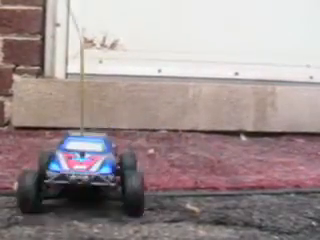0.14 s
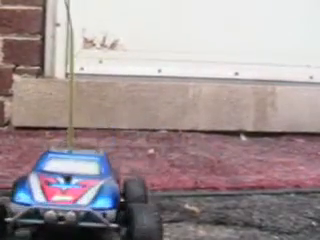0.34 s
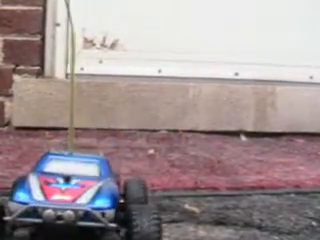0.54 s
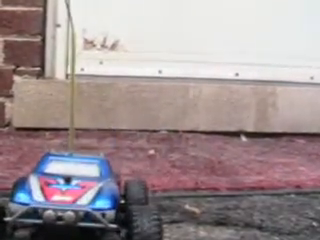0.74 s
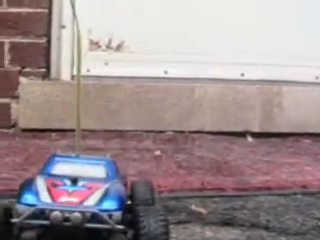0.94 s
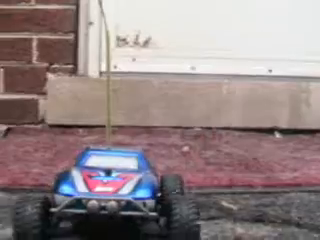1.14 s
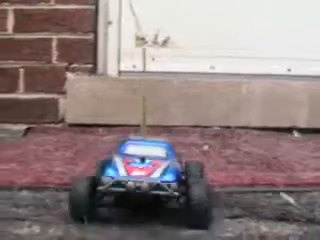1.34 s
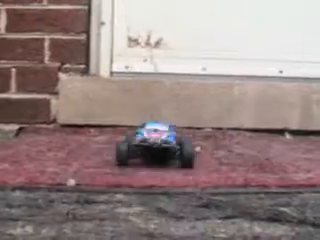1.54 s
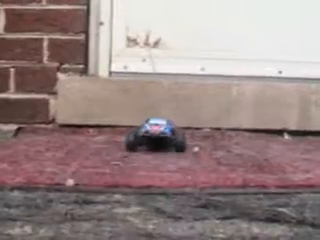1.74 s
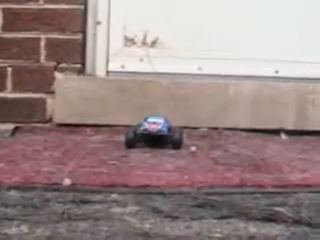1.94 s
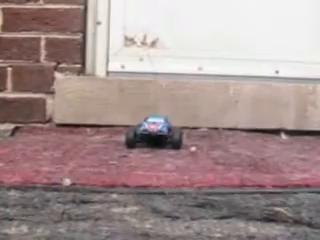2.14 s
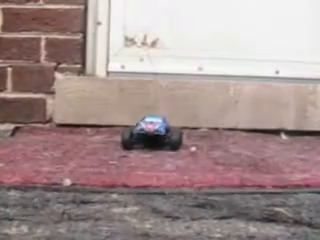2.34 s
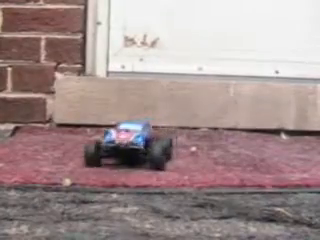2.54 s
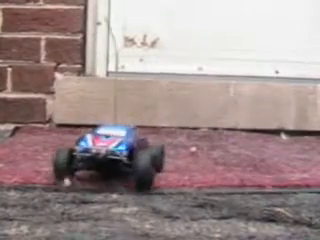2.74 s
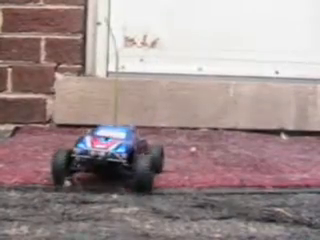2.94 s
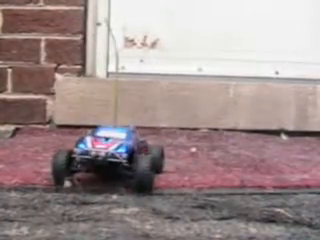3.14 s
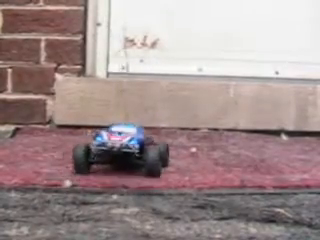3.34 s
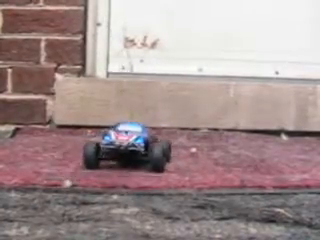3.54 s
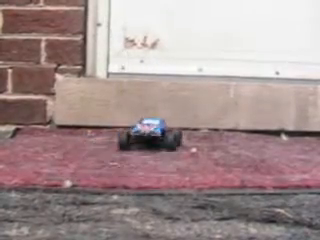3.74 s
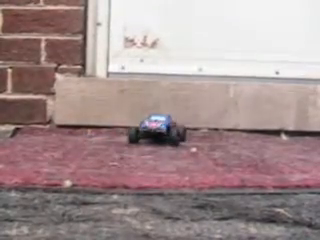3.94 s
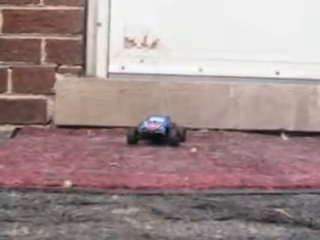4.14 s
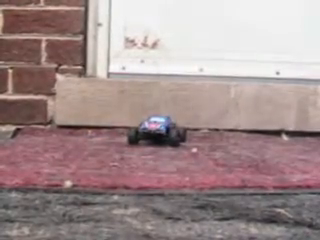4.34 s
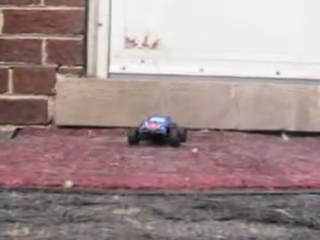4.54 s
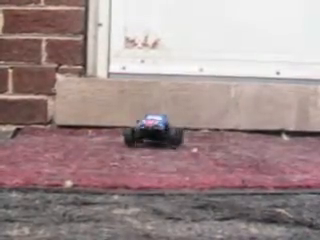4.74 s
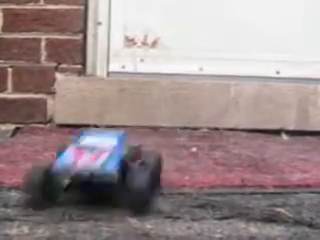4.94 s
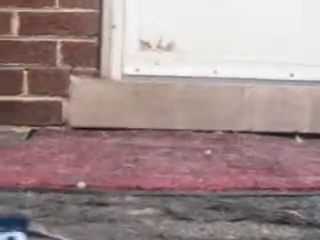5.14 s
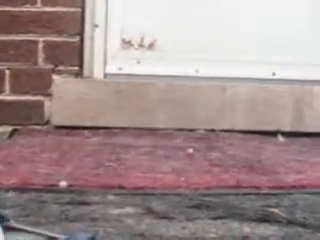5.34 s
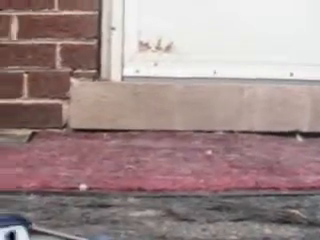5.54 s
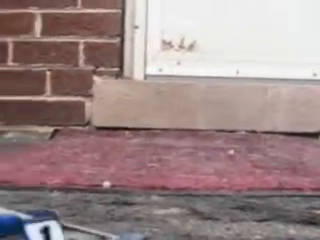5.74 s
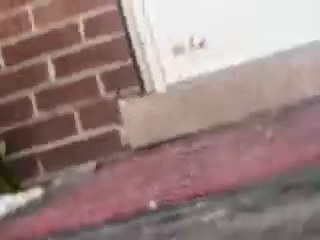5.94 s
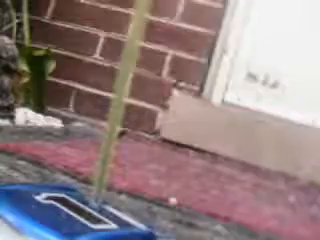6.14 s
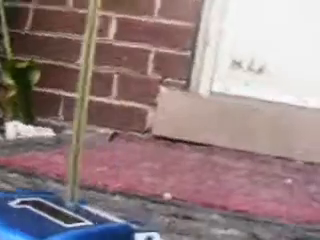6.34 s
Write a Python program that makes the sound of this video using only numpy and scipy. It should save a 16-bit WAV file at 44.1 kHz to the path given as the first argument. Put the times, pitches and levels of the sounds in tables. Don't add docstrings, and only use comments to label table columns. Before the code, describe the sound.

A small electric model truck squeaks, whirrs and zips in short gear-whine bursts with plastic clacks, then the microphone is bumped and handled.

```python
import sys
import numpy as np
from scipy import signal
from scipy.fft import rfft, irfft, next_fast_len
from scipy.io import wavfile
from scipy.ndimage import uniform_filter1d

SR = 44100
rng = np.random.default_rng(int(sys.argv[2]) if len(sys.argv) > 2 else 0)


def wav_out(sig):
    wavfile.write(sys.argv[1], SR, np.round(np.clip(np.atleast_2d(sig).T, -1, 1) * 32767).astype(np.int16))


def amplitude_ratio(level_db):
    exponent = np.asarray(level_db, float) / 20
    return 10 ** exponent


N = 281351
TIME = np.arange(N) / SR

# (frequency [Hz], level [dB], t60 [s])
GEARBOX_MODES = [(2080, 4, .012), (3020, 6, .012), (3800, 5, .012), (4250, 1, .012)]


def rms_one(x):
    return x / np.sqrt(np.mean(x ** 2) + 1e-20)


def levels(tables, column):
    out = np.zeros(N)
    for rows in map(np.array, tables):
        out += amplitude_ratio(np.interp(TIME, rows[:, 0], rows[:, column], left=-200, right=-200))
    return uniform_filter1d(out, size=66)


def gate(on, off):
    return np.clip(np.minimum(TIME - on, off - TIME) * 500, 0, 1)


def drift(hz):
    pole = np.exp(-2 * np.pi * hz / SR)
    noise = rng.standard_normal(N + SR)
    return rms_one(signal.lfilter([1], [1, -2 * pole, pole * pole], noise)[SR:])


def colour(x, spectrum):
    hz, db = np.transpose(spectrum)
    bins_hz = np.arange(N // 2 + 1) * SR / N + 1
    response = amplitude_ratio(np.interp(np.log(bins_hz), np.log(hz), db))
    return rms_one(irfft(rfft(x) * response, N))


def grains(per_s, spread_db):
    sizes = amplitude_ratio(spread_db * np.minimum(rng.exponential(1, N), 5)) * rng.choice([-1, 1], N)
    return sizes * (rng.random(N) < per_s / SR)


def ring(x, hz, t60):
    radius = amplitude_ratio(-60 / (t60 * SR))
    angle = 2 * np.pi * min(hz, 9000) / SR
    return signal.lfilter([0, np.sin(angle)], [1, -2 * radius * np.cos(angle), radius * radius], x)


def blows(events, modes, t60, crack_db, contact_s):
    size = 6000
    out = np.zeros(N + size)
    t = np.arange(size) / SR
    for s, peak_db, bright_db, part_hz in events:
        rough = rng.standard_normal((2, size))
        rough[:, 0] = 6.0, 4.0
        contact = rough[0] * np.exp(-t / contact_s)
        body = 0
        for hz, db, ring_s in modes:
            octaves_off = abs(np.log2(hz / part_hz))
            body = body + amplitude_ratio(db - 6.0 * octaves_off) * ring(contact, hz, ring_s)
        body = body * amplitude_ratio(-60 * t / max(t60, .01))
        crack = np.diff(rough[1], prepend=0) * amplitude_ratio(-60 * t / max(0.5 * t60, .01))
        at = round(s * SR)
        out[at:at + size] += amplitude_ratio(peak_db) * (body / np.abs(body).max() + amplitude_ratio(crack_db + bright_db) * crack)
    return out[:N]


def swells(rows, start_db, end_db, stop_s=0.015):
    stop_db = -13.5
    tables = []
    for on, peak, off, db in rows:
        last_db = db + end_db
        tables.append([(on, db + start_db), (peak, db), (off, last_db), (off + stop_s, last_db + stop_db),
                       (off + 2.85 * stop_s, last_db + 2 * stop_db)])
    return tables


def yard():
    # (frequency [Hz], density [dB per Hz])
    air_spectrum = [(18, -30), (30, -15), (59, 4.5), (86, -13), (106, -5), (205, -1), (320, -8.5),
                    (359, -8), (1190, -15), (1300, -18), (1650, -19), (2340, -25.5), (8100, -49.5),
                    (10500, -79), (17800, -120)]
    # (frequency [Hz], rms level [dB])
    fan_tones = [(56, -50.5), (119.5, -45.5)]
    hum = 0
    for hz, db in fan_tones:
        hum = hum + amplitude_ratio(db + 1.1 * drift(4.1)) * np.sin(2 * np.pi * hz * TIME + 0.51 * drift(1.0))
    return amplitude_ratio(-38.5 + drift(4)) * colour(rng.standard_normal(N), air_spectrum) + hum


def microphone_shell():
    # (time [s], peak level [dB], brightness [dB], pitch of the part [Hz])
    knock_events = [(5.192, 4.5, -27, 371), (5.623, -26, -40, 724), (5.791, -25.5, -29, 533),
                    (5.84, -18.5, -18, 660), (5.89, -8.5, -13, 1330), (5.899, -6, -12, 1330),
                    (5.956, -22.5, -26, 861), (5.999, -17, -10, 517), (6.019, -24, -10, 1170),
                    (6.028, -10.5, -12, 1250), (6.041, -14.5, -7, 716), (6.076, -17.5, -13, 896),
                    (6.137, -4.5, -27, 1240), (6.148, -1, -6, 770), (6.21, -5, -13, 1230),
                    (6.219, -42, -35, 896), (6.313, -13.5, -18, 1166), (6.345, -18, -40, 880),
                    (6.359, -11, -40, 626)]
    # (frequency [Hz], level [dB], t60 [s])
    shell_modes = [(194, -6, 0.063), (384, -4.5, 0.11), (530, -1.5, 0.045), (738, 5.5, 0.063),
                   (985, 6.5, 0.027), (1222, 11.5, 0.017), (1546, -1, 0.033), (1760, -3.5, 0.036),
                   (2270, 6, 0.0042), (3300, -8, 0.013)]
    # (on [s], firmest [s], off [s], level [dB])
    finger_slides = [(5.775, 5.815, 6.1, -43), (5.915, 5.97, 6.3, -39), (6.0, 6.012, 6.04, -20.5),
                     (6.12, 6.145, 6.2, -16), (6.222, 6.228, 6.28, -31.5), (6.28, 6.32, 6.95, -35)]
    # (frequency [Hz], density [dB per Hz])
    rub_spectrum = [(120, -41), (200, -29), (281, -26), (531, -1), (1220, -3.5), (2380, -16.5), (6130, -24),
                    (8100, -36), (10500, -69), (17800, -120)]
    # (on [s], off [s], frequency [Hz], level [dB])
    servo_tones = [(0.045, 0.262, 347.6, -47.5), (2.483, 2.9, 737, -55.5), (5.284, 5.458, 882, -55.5),
                   (5.924, 6.079, 875, -47.5), (6.056, 6.336, 894, -41)]
    # (length [s], level [dB])
    gust = (0.041, -30.5)
    gust_s = 4.92
    rub = colour(grains(4000, spread_db=4), rub_spectrum)
    rub = levels(swells(finger_slides, start_db=-31, end_db=-17), column=1) * rub
    servo = sum(gate(on, off) * amplitude_ratio(db + 7.5) * np.sin(2 * np.pi * hz * TIME) for on, off, hz, db in servo_tones)
    knocks = blows(knock_events, shell_modes, t60=.08, crack_db=-12.5, contact_s=0.0068)
    knocks = signal.sosfilt(signal.butter(2, 130.0, "high", fs=SR, output="sos"), knocks)
    puff = amplitude_ratio(gust[1]) * drift(47) * np.exp(-((TIME - gust_s) / gust[0]) ** 2)
    return knocks + rub + puff + servo * amplitude_ratio(1.5 * drift(8))


def chassis_clacks():
    # (time [s], peak level [dB], brightness [dB], pitch of the part [Hz])
    clack_events = [(0.096, -19, -12, 1420), (0.318, -27, 3, 1040), (0.471, -21.5, -16, 1600),
                    (0.5112, -30, 3, 3020), (0.799, -26.5, -14, 1560), (1.262, -18.5, -13, 1030),
                    (1.452, -19, -20, 1000), (1.468, -19, -20, 1134), (2.218, -9.5, -22, 990),
                    (2.763, -25.5, -8, 2040), (2.8694, -21.5, -7, 3600), (2.87, -26.5, -11, 700),
                    (3.001, -26.5, -14, 1500), (3.2016, -27.5, -9, 3230), (3.4371, -31, -15, 3100),
                    (3.461, -40, -14, 724), (4.639, -11.5, -19, 776), (5.069, -20, 4, 3020),
                    (5.134, -15, -4, 1080), (5.269, -24, -6, 1370), (5.3, -16.5, -35, 800)]
    # (frequency [Hz], level [dB], t60 [s])
    chassis_modes = [(510, -8.5, 0.78), (630, -19, 0.048), (800, 8.5, 0.07), (1030, 9.5, 0.028),
                     (1330, 7, 0.0086), (1640, 10, 0.079), (2024, 5, 0.051), (2110, -5, 0.16),
                     (3080, 6, 0.023), (4060, -49, .015)]
    clacks = blows(clack_events, chassis_modes, t60=.065, crack_db=-8.0, contact_s=.005)
    door = amplitude_ratio(-43) * ring(clacks, hz=495, t60=.08)
    return clacks + door


def squeaks():
    # (time [s], peak level [dB], pitch [Hz])
    squeak_events = [(0.0024, -20, 3100), (0.1446, -34, 3170), (0.1758, -24.5, 3020), (0.2958, -28.5, 3060),
                     (1.6957, -33, 2930), (3.888, -29, 3010), (4.797, -32, 2860)]
    out = np.zeros(N)
    for s, peak_db, hz in squeak_events:
        t = np.clip(TIME - s, 0, 1)
        envelope = t / 0.0023 * np.exp(-t / 0.0019)
        out += amplitude_ratio(peak_db + 17.5) * envelope * np.sin(2 * np.pi * hz * t * (1 - 5.7 * t))
    return out


def rolls(column):
    # (on [s], off [s], gear hiss [dB], chassis rattle [dB])
    gentle_rolls = [(0.0, 0.395, -30.5, -35.5), (1.103, 1.147, -34.5, -36), (1.63, 1.898, -38.5, -42.5),
                    (2.393, 2.467, -36, -41), (2.556, 2.804, -41, -42), (3.23, 3.274, -40.5, -54),
                    (3.436, 3.47, -43.5, -52), (3.849, 4.004, -34, -46), (4.769, 5.074, -30, -37),
                    (5.208, 5.257, -40, -29)]
    fade_db_per_s = 17
    tables = []
    for row in gentle_rolls:
        on, off = row[:2]
        tables += swells([(on, on + 0.0048, off, row[column])], -9.0, -fade_db_per_s * (off - on), stop_s=0.037)
    return tables


def catches():
    per_s = 83
    out = 0
    for hz, db, t60 in GEARBOX_MODES:
        snag = signal.lfilter([1], [1, -.99], np.abs(grains(per_s / 4, spread_db=3.0)))
        out = out + amplitude_ratio(db) * ring(snag * rng.standard_normal(N), hz, 3.5 * t60)
    return rms_one(out)


def running(swell_db):
    # (frequency [Hz], density [dB per Hz])
    rattle_spectrum = [(250, -14), (550, -6.5), (850, -7), (1100, -2.5), (1550, -7.5), (2100, -6.5),
                       (3500, -23), (5000, -20), (6300, -27.5), (8100, -39)]
    # (frequency [Hz], density [dB per Hz])
    hiss_spectrum = [(710, -20), (1200, -18), (1500, -6.5), (2050, -5), (2630, -7.5), (3080, -2),
                     (3500, -5), (4240, -3.5), (6320, -25.5), (8100, -10), (10500, -59), (17800, -120)]
    # (on [s], worst [s], off [s], level [dB])
    tyre_shakes = [(0.2, 0.35, 0.42, -35.5), (1.3, 1.468, 1.63, -17.5), (2.45, 2.502, 2.53, -32),
                   (3.28, 3.363, 3.42, -33.5), (3.575, 3.725, 3.86, -24), (3.96, 3.996, 4.03, -32),
                   (5.07, 5.184, 5.133, -16), (5.19, 5.199, 5.232, -11)]
    # (on [s], full [s], off [s], level [dB])
    motor_pulls = [(0.0, 0.008, 0.011, -18), (1.287, 1.41, 1.61, -20), (1.67, 1.698, 1.717, -29),
                   (2.39, 2.5, 2.62, -32.5), (3.27, 3.362, 3.394, -30.5), (3.562, 3.645, 3.83, -23.5),
                   (4.82, 4.91, 4.98, -25), (4.9, 5.02, 5.075, -25), (5.065, 5.14, 5.2, -20)]
    shake = grains(3500 * amplitude_ratio(2.5 * drift(60)), spread_db=3.5)
    rattle = colour(shake, rattle_spectrum) * amplitude_ratio(1.8 * drift(75))
    rattle = signal.sosfilt(signal.butter(2, 600, "high", fs=SR, output="sos"), rattle)
    hiss = colour(grains(9000, spread_db=2.5), hiss_spectrum) * amplitude_ratio(0.28 * swell_db + 1.96 * drift(90))
    shaking = levels(rolls(column=3) + swells(tyre_shakes, start_db=-13, end_db=-18), column=1)
    pulling = levels(rolls(column=2) + swells(motor_pulls, start_db=-15, end_db=-5), column=1)
    gear_noise = rms_one(hiss) + amplitude_ratio(-10) * catches()
    return shaking * rms_one(rattle) + amplitude_ratio(-3.0) * pulling * gear_noise


def whine():
    # (on [s], off [s], whine level [dB], pulse duty [0-1])
    throttle = [(1.106, 1.16, -34.5, 0.2), (1.284, 1.351, -35.5, 0.26), (1.762, 1.809, -41, 0.08),
                (2.382, 2.458, -38, 0.56), (3.232, 3.278, -38.5, 0.27), (3.293, 3.365, -35.5, 0.41),
                (3.559, 3.6, -41, 0.26), (3.873, 3.909, -37, 0.5), (4.764, 4.85, -41.5, 0.5)]
    # (frequency [Hz], level [dB])
    can_response = [(900, -8), (2000, 2.5), (3000, 3.5), (4000, -6), (5000, -18), (6000, -17), (7000, -12)]
    switch_hz = 982
    out = 0
    hz, db = np.transpose(can_response)
    for k in range(1, 8):
        size = sum(gate(on, off) * amplitude_ratio(level_db) * np.sin(np.pi * k * duty) for on, off, level_db, duty in throttle)
        can = amplitude_ratio(np.interp(k * switch_hz, hz, db) + 2.5 * drift(60))
        out = out + size * can * np.sin(2 * np.pi * k * switch_hz * TIME + k * k + .5 * drift(90))
    return out


def revs():
    # (start [s], top tooth rate [Hz], brake [s], tone level [dB])
    full_revs = [
        (1.352, 4946, 1.553, 3),
        (3.612, 4500, 3.768, -2),
    ]
    # (tooth rate [Hz], level [dB])
    tone_by_speed = [(1400, -40), (2100, -25.5), (3000, -23), (4200, -26), (5000, -18)]
    rest_hz, spin_up_hz_per_s, brake_hz_per_s, brake_db = 1400, 43000, 50000, -6
    hz, db = np.transpose(tone_by_speed)
    for start, top_hz, brake, level_db in full_revs:
        speed = np.linspace(rest_hz, top_hz, num=12)
        tone = np.interp(speed, hz, db) + level_db
        yield np.c_[start + (speed - rest_hz) / spin_up_hz_per_s, speed, tone]
        yield np.c_[brake + (top_hz - speed) / brake_hz_per_s, speed, tone + brake_db][::-1]


def gears():
    # (time [s], tooth rate [Hz], tone level [dB])
    arrive = [(0.012, 2500, -30), (0.03, 2150, -28), (0.066, 1770, -70), (0.154, 1603, -37),
              (0.2, 1530, -54)]
    nudge = [(2.46, 1900, -35), (2.478, 1990, -30), (2.496, 2153, -20.5), (2.51, 1993, -25),
             (2.525, 1540, -52)]
    wheelspin = [(4.848, 1450, -27), (4.87, 2520, -24), (4.887, 3480, -22), (4.912, 3940, -18),
                 (4.96, 4130, -18)]
    lift_off = [(4.96, 4350, -11), (4.982, 4950, -18), (5.002, 5010, -14.5), (5.026, 4100, -21),
                (5.078, 2900, -29), (5.16, 2400, -35)]
    coast = [(1.66, 1320, -35.5), (1.705, 1390, -36.5), (1.73, 1400, -57), (1.749, 1137, -55),
             (1.785, 1100, -35), (1.83, 1080, -55), (1.92, 1100, -42)]
    # (a tightest moment [s], swell [dB], shaft rate [Hz])
    runout = [
        (.03, 4, 45),
        (1.39, 6, 53),
        (1.585, 5, 48),
        (2.483, 6, 45),
        (3.647, 6, 57),
        (3.79, 5, 57),
        (4.914, 4, 77),
        (5.011, 5, 67),
        (1.668, 3, 33),
    ]
    free, stalled, slack = (0, -19, -34), (-3, 2, -45), (-22, -4, 0)
    overrun = (0, -36, -46)
    climb, fall, climb_again, fall_again = revs()
    songs = [arrive, climb, fall, nudge, climb_again, fall_again, wheelspin, lift_off, coast]
    kinds = [free, overrun, overrun, stalled, overrun, overrun, free, overrun, slack]
    rows = np.array(sorted(map(tuple, np.vstack(songs))))
    tooth_hz = np.interp(TIME, rows[:, 0], rows[:, 1]) * (1 + 0.0208 * drift(144.0))
    teeth = np.cumsum(tooth_hz) / SR
    swell_db, song = np.zeros(N), np.zeros(N)
    for table, kind, (tight, depth_db, shaft_hz) in zip(songs, kinds, runout):
        turning = gate(table[0][0], table[-1][0])
        swell_db += depth_db * turning * np.cos(2 * np.pi * shaft_hz * (TIME - tight))
        partials = sum(amplitude_ratio(db) * np.sin(2 * np.pi * (k + 1) * teeth) for k, db in enumerate(kind))
        song += levels([table], column=2) * partials
    song = song * amplitude_ratio(1.3 * swell_db + 3.5 * drift(110) - 3)
    flare = sum(amplitude_ratio(db) * 14 / (t60 * SR) * ring(song, hz, t60) for hz, db, t60 in GEARBOX_MODES)
    return song + flare, swell_db


def scene():
    # (delay [s], level [dB])
    wall_echoes = [(.006, -21.5), (.013, -18), (.024, -20)]
    song, swell_db = gears()
    truck = song + whine() + squeaks() + running(swell_db) + chassis_clacks()
    echoes = sum(amplitude_ratio(db) * np.interp(TIME - s, TIME, truck, left=0) for s, db in wall_echoes)
    dull_echoes = signal.lfilter([.4], [1, -.6], echoes)
    return (truck + dull_echoes + microphone_shell() + yard())[None]


def roll_off(x):
    return signal.sosfilt(signal.butter(12, 13160, fs=SR, output="sos"), x)


def record(dry):
    # (on [s], off [s], low edge [Hz], high edge [Hz])
    lost_bands = [(3.24, 3.55, 6300, 6900), (3.3, 3.55, 5100, 5500), (3.62, 3.86, 5600, 6600),
                  (3.86, 4.02, 5800, 6300), (4.775, 4.97, 5400, 6600), (4.97, 5.06, 5900, 6500)]
    sample_hz, cutoff_hz = 16004, 12980
    x = np.clip(dry + .12 * dry ** 2, -.85, .85)
    x = signal.sosfilt(signal.butter(4, 46.0, "high", fs=SR, output="sos"), x)
    loudness = np.sqrt(uniform_filter1d(x ** 2, size=128) + 1e-12)
    x = x + amplitude_ratio(-24.5) * loudness * rng.standard_normal(N)
    hz = np.arange(N // 2 + 1) * SR / N
    x = irfft(rfft(x) / (1 + (2 * hz / sample_hz) ** 24), N)
    size = next_fast_len(N)
    spectrum = rfft(x, size)
    bins = np.arange(size // 2 + 1) * SR / size
    for on, off, low_hz, high_hz in lost_bands:
        band = irfft(spectrum * (bins > low_hz) * (bins < high_hz), size)[:, :N]
        x = x - uniform_filter1d(gate(on, off), size=600) * band
    x = x * (1 + 2 * np.cos(2 * np.pi * sample_hz * TIME))
    held = irfft(rfft(x) * np.sinc(hz / sample_hz) / (1 + (hz / cutoff_hz) ** 200), N)
    return roll_off(held)


dry = scene()
out = record(dry)
wav_out(out)
```